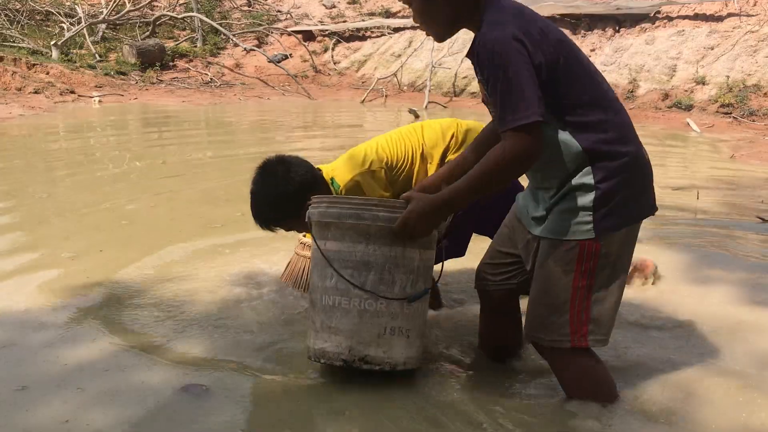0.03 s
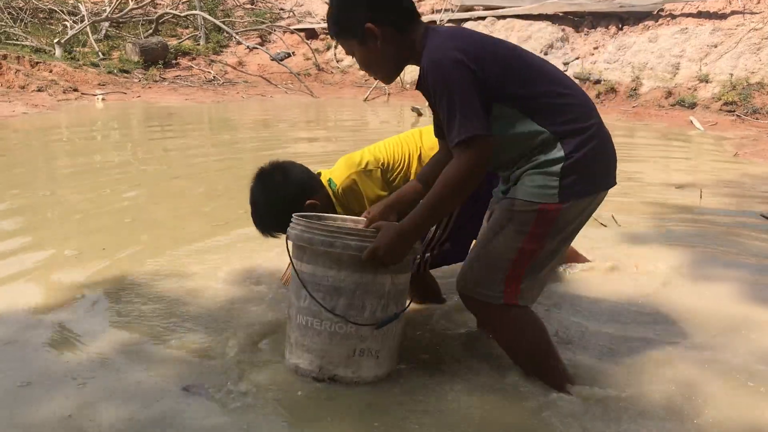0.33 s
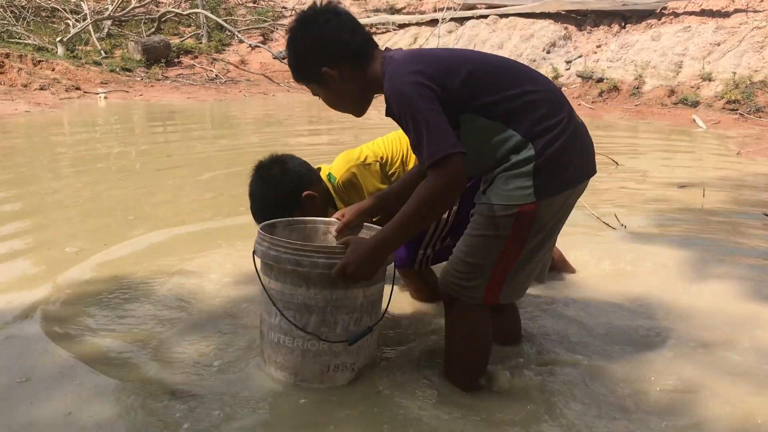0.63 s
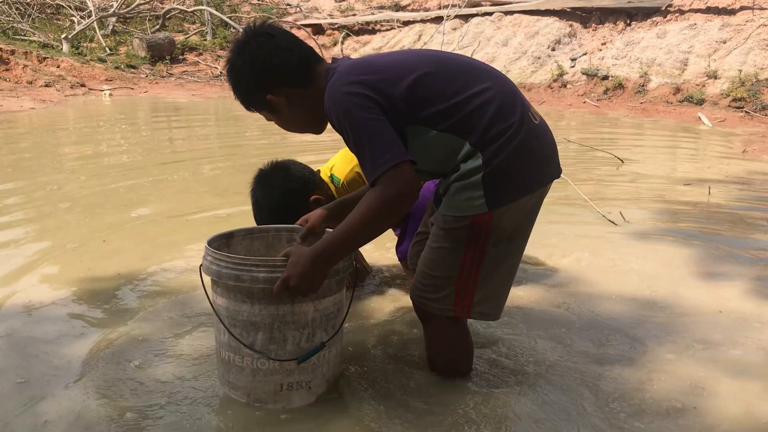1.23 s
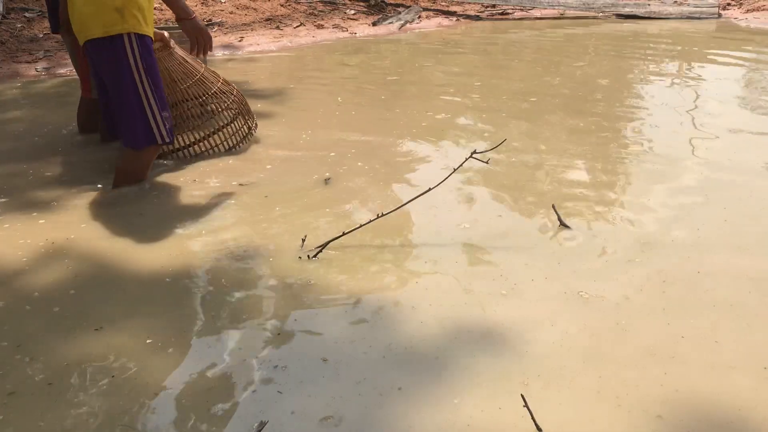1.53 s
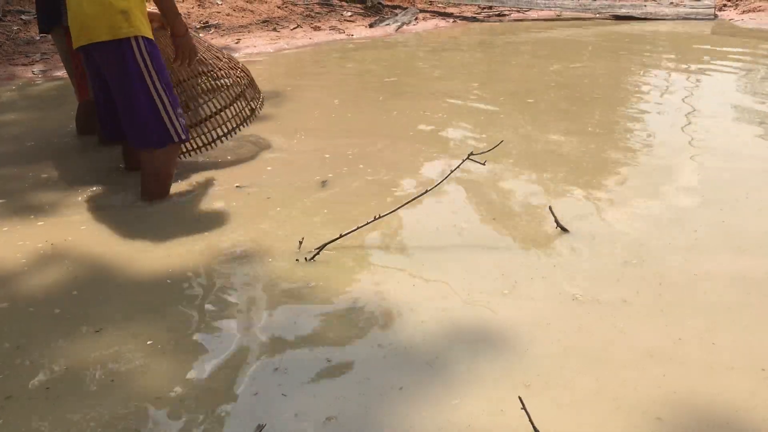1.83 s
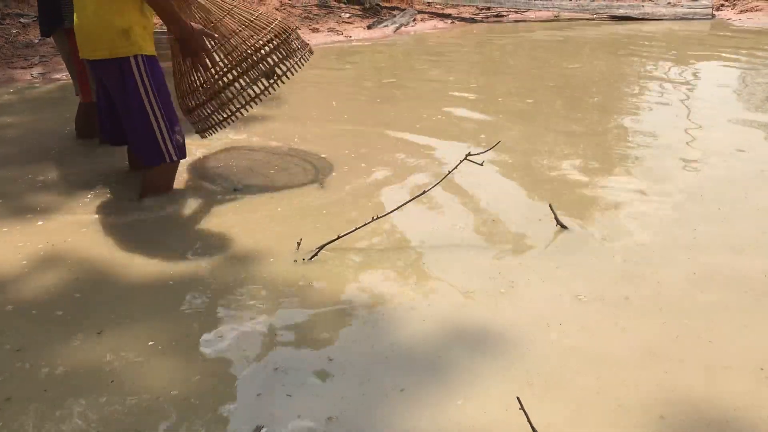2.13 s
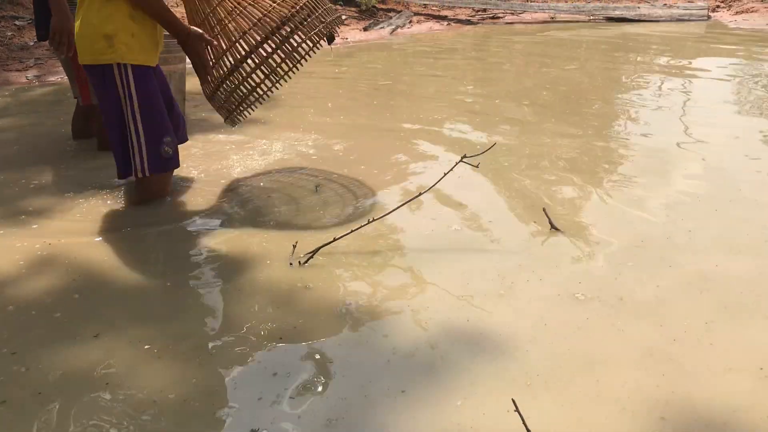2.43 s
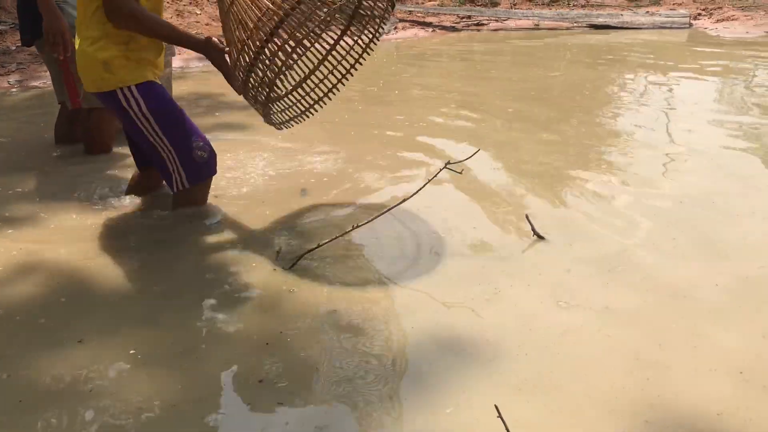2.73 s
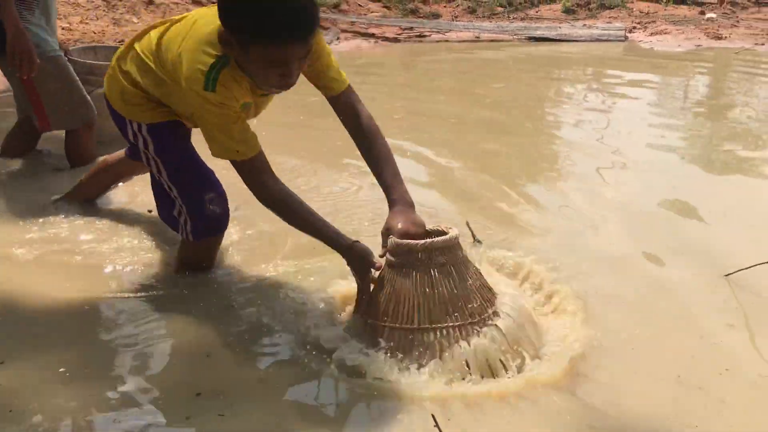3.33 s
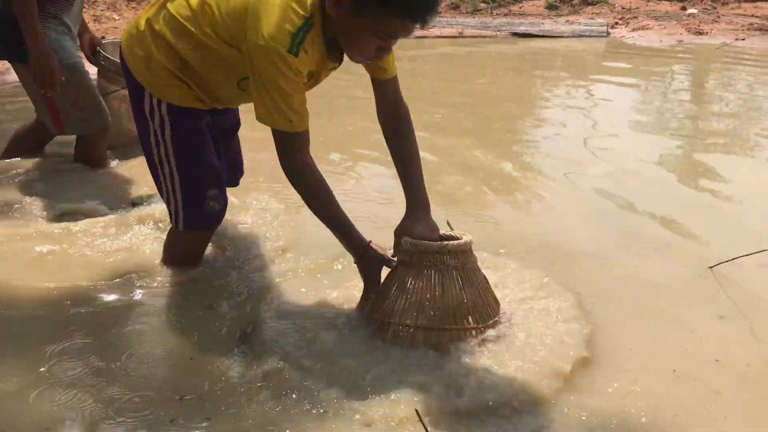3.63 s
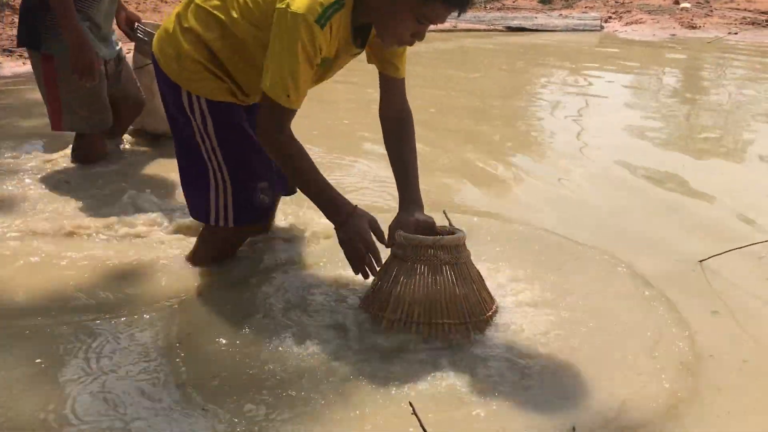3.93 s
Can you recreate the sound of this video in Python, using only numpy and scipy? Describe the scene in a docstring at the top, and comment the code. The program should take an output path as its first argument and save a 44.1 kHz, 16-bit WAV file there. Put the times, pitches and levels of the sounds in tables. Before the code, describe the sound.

A loud splash in a shallow pond comes near the end, as a wicker trap is plunged in close by. Before it, wading legs and a bucket stir soft swishes, drips and gurgles. Cicadas buzz in the background outdoors.

```python
"""A shallow pond among trees: children wade, and legs and a bucket stir up swishes, drips and gurgles.
After an abrupt change of place a wicker fish trap is lifted, dripping, and plunged into the water:
its rim slaps the surface, spray flies through the canes, the water churns and drops fall back.
The water sounds by impact and by bubble resonance, trapped air ringing like a mass on a spring.
Cicadas buzz throughout, their rapid clicks forcing narrow body resonances."""
import sys
import numpy as np
from scipy import signal
from scipy.fft import rfft, irfft
from scipy.io import wavfile
from scipy.ndimage import uniform_filter1d, map_coordinates

SR = 44100
rng = np.random.default_rng(int(sys.argv[2]) if len(sys.argv) > 2 else 0)


def to_wav(s):
    """Save 16-bit WAV."""
    ch = np.atleast_2d(s).T  # columns
    pcm = np.round(np.clip(ch, -1, 1) * 32767)  # PCM
    wavfile.write(sys.argv[1], SR, pcm.astype(np.int16))


N = 176400
TIME, BIN_HZ = np.arange(N) / SR, np.arange(N // 2 + 1) * SR / N
PLACE_CHANGE_S, PLUNGE_ATTACK_S, BUBBLE_RISE_OCT = 1.474, .004, 0.38

# Envelopes of the plunge; the wash is the wave rolling back on the trap: time_s, relative_level_db
SPRAY_ENVELOPE = [(3.274, -42.5), (3.302, -39.5), (3.338, -34.5), (3.4, -34.5), (3.416, -35.5),
                  (3.432, -40), (3.484, -34.5), (3.515, -44.5), (3.574, -46), (3.606, -41), (3.634, -51),
                  (3.73, -55), (4.0, -52)]
CHURN_ENVELOPE = [(3.274, -47.5), (3.342, -39.5), (3.354, -24.5), (3.392, -29.5), (3.414, -24.5),
                  (3.444, -31.5), (3.456, -28), (3.576, -44.5), (3.582, -38), (3.738, -59.5), (3.76, -50)]
GULP_ENVELOPE = [(3.32, -70), (3.328, -98), (3.348, -40), (3.45, -43.5), (3.522, -66), (3.582, -58.5),
                 (3.656, -81), (3.72, -60)]
WASH_ENVELOPE = [(3.70, -84), (3.82, -54), (3.9, -61), (4, -77)]
# Their spectra: frequency_hz, gain_db
SPRAY_SPECTRUM = [(1290, 1.5), (2200, 0.5), (2310, -4), (2700, -0.5), (4940, -6), (6430, -10.5),
                  (10000, -15), (10400, -20), (11400, -10.5), (15800, -14)]
CHURN_SPECTRUM = [(520, -0.5), (680, -6.5), (900, 1.5), (1200, 0), (1600, -1), (1950, -16), (2600, -13)]
GULP_SPECTRUM = [(110, -19), (160, -6), (210, 1.5), (260, -6.5), (340, 2), (520, -13.5)]
WASH_SPECTRUM = [(160, 5), (260, 7), (420, 8.5), (700, -27)]
def plunge():
    """Air entrainment: the trap drives air under; small bubbles ring high, large pockets low."""
    spray = bubble_cloud(SPRAY_SPECTRUM, cycles=8.5, size_db=2.5, foam_db=-3, count=2500)
    churn = bubble_cloud(CHURN_SPECTRUM, cycles=29, size_db=3.5, foam_db=-9, count=700)
    gulp = bubble_cloud(GULP_SPECTRUM, cycles=16.6, size_db=2, foam_db=0, count=200)
    crackle = spatter(N, hz=7500, width_hz=9000, size_db=5, count=7000)  # drops on cane and water
    wash = bubble_cloud(WASH_SPECTRUM, cycles=17, size_db=3, foam_db=0, count=250)
    tail_trim = from_db(-13 * np.maximum(TIME - 3.84, 0))  # the last spray holds nearly level, a faint fizz
    return (tail_trim * burst(SPRAY_ENVELOPE) * (spray + from_db(-13.5) * crackle)
            + from_db(-5.5) * burst(CHURN_ENVELOPE) * churn
            + from_db(-2) * burst(GULP_ENVELOPE) * gulp
            + burst(WASH_ENVELOPE) * wash)


def bubble_cloud(spectrum, cycles, size_db, foam_db, count):
    """Superposition: many random bubbles merge into an even stream over foam noise."""
    out, start_s = np.zeros(N), SPRAY_ENVELOPE[0][0] - PLUNGE_ATTACK_S
    for when, pitch, size, ring, sign in rng.random((count, 5)):
        hz = (np.sqrt(spectrum[0][0]) * (1 - pitch) + np.sqrt(spectrum[-1][0]) * pitch) ** 2
        gain = size_gain(size, size_db) * hz ** .75 * np.sign(sign - .5)
        tone = bubble(hz, cycles * (.5 + ring) / hz, BUBBLE_RISE_OCT * ring)
        add(out, start_s + when * (N / SR - start_s), gain * tone)
    out = colour(out, spectrum)
    power = uniform_filter1d(out ** 2, size=1500)
    even = out / np.sqrt(np.abs(power) + power.max() / 1000)
    return (even + from_db(foam_db) * noise(spectrum)) / np.sqrt(1 + from_db(2 * foam_db))


def bubble(hz, t60_s, rise_oct):
    """Damped oscillation: a bubble rings, gliding in pitch as it nears the surface."""
    age = np.arange(int(t60_s * SR) + 4) / (t60_s * SR)  # share of the ring time
    envelope = (1 - np.exp(-age / 0.057)) * np.exp(-np.log(1000) * age)
    pitch_hz = np.minimum(hz * 2 ** (rise_oct * age), SR / 2)
    return envelope / envelope.max() * np.sin(2 * np.pi * np.cumsum(pitch_hz) / SR)


# Pushes of water: start_s, length_s, level_db, centre_hz, spread_oct
WATER_PUSHES = [(-.02, 0.15, -55.5, 915, 1.19), (0.127, 0.18, -52.5, 1200, 1.2),
                (.275, .15, -52.5, 1252, 1.1), (0.393, .10, -57.5, 2700, 0.9),
                (.46, 0.15, -49.5, 2166, 0.86), (0.57, 0.22, -52.5, 1744, 0.99),
                (.76, 0.34, -60, 1350, 1.1), (1.036, 0.29, -64.5, 1910, 1), (1.256, 0.23, -63, 1204, 1.12),
                (1.602, 0.18, -73, 1163, 1.35), (1.822, 0.52, -71.5, 983, 0.97),
                (2.577, 0.34, -68, 1337, 1.22), (2.827, .19, -60, 2270, 0.78),
                (2.86, 0.14, -54.5, 1067, 0.35), (3.022, 0.077, -54, 1006, 0.75),
                (3.084, 0.19, -59.5, 1337, 0.7), (3.729, 0.24, -58, 1030, 1.55),
                (3.82, 0.34, -47.5, 966, 1.12)]
def swishes(count=150):
    """Displacement: water pushed aside swells and ebbs, shedding bubbles, foam and tiny impacts."""
    out, octave = np.zeros(N), np.log2(np.arange(1, SR // 2 + 2))
    for start_s, length_s, db, centre_hz, spread_oct in WATER_PUSHES:
        n, fizz = int(length_s * SR), np.zeros(N)
        for (when, size, ring), scatter in zip(rng.random((count, 3)), rng.standard_normal(count)):
            hz = np.clip(centre_hz * 2 ** (spread_oct * scatter), 180, 9000)
            gain = size_gain(size, size_db=3) * np.sqrt(min(hz, centre_hz))
            tone = bubble(hz, t60_s=21 * (.5 + ring) / hz, rise_oct=2 * BUBBLE_RISE_OCT * ring)
            add(fizz, when * length_s, gain * tone)
        detuning = (octave - np.log2(centre_hz)) / (2.8 * spread_oct)
        band = (1 + detuning ** 2) ** -2.2 / np.sqrt(2 ** octave + centre_hz)
        foam = from_db(-7.5) * rms_one(irfft(rfft(rng.standard_normal(SR)) * band)[:n])
        ticks = from_db(-11) * spatter(n, hz=2700, width_hz=2000, size_db=3.5, count=70)
        swell = np.sqrt(np.interp(np.arange(n) / n, [0, 0.23, 1], [0, 1, 0]))
        add(out, max(start_s, 0), from_db(db) * swell * (rms_one(fizz[:n]) + foam + ticks))
    return out


# Single bubbles and drips: start_s, pitch_hz, peak_db, t60_s, rise_oct
SINGLE_BUBBLES = [(.047, 684, -47, 0.035, -0.63), (.126, 2140, -38, 0.018, 0.42),
                  (0.1473, 2360, -26, 0.0041, 0.71), (0.16, 2180, -34, 0.012, 0.41),
                  (.152, 230, -55, 0.087, 0.54), (.211, 1004, -41.5, 0.033, 0.0043),
                  (0.266, 1990, -35, 0.028, 0.15), (.270, 520, -42.5, 0.076, 1.19),
                  (.291, 1400, -38.5, 0.017, 0.31), (.292, 2130, -33, 0.0095, 0.12),
                  (.301, 810, -43, 0.03, -0.49), (.298, 260, -49, 0.054, -0.64),
                  (.314, 612, -48, 0.053, -0.12), (.3655, 700, -39.5, 0.038, 0.4),
                  (0.363, 1576, -47, 0.041, 0.5), (.391, 1060, -44, 0.04, 0.95),
                  (0.42, 2270, -44, 0.024, 1.5), (.437, 1970, -42, 0.041, 0.3),
                  (.466, 666, -43, 0.048, 0.27), (0.4657, 1650, -36, 0.0066, 0.12),
                  (.479, 1350, -38, 0.02, -0.31), (.510, 1360, -43, 0.017, 0.11),
                  (.510, 2800, -42, 0.014, -0.25), (.575, 2090, -39, 0.019, 0.44),
                  (.633, 1420, -44.5, 0.014, 0.3), (0.6484, 2030, -34.5, 0.013, 0.07),
                  (0.691, 2320, -44, 0.018, 0.15), (.750, 1150, -48, 0.043, 0.14),
                  (.761, 1020, -42.5, 0.049, 0.26), (.757, 368.7, -42.5, 0.17, 0.57),
                  (.775, 660, -44.5, 0.027, 0.63), (0.8229, 2080, -35.5, 0.026, 0.69),
                  (.942, 940, -52.5, 0.039, -0.14), (1.09, 2130, -56, 0.042, -0.051),
                  (1.211, 1450, -49, 0.022, -0.093), (1.248, 783, -48, 0.053, 1.35),
                  (1.283, 287, -46, 0.053, -0.32), (1.285, 2170, -51, 0.03, 0.053),
                  (1.298, 625, -50.5, 0.058, 0.68), (1.31, 1530, -45, 0.019, 0.044),
                  (1.374, 2430, -47.5, 0.021, -0.085), (1.406, 1280, -49.5, 0.026, 0.65),
                  (1.439, 1270, -51, 0.031, 0.28), (1.628, 225, -56.5, 0.085, -0.73),
                  (1.635, 794, -55, 0.02, 0.4), (1.945, 188.4, -58, 0.28, -0.83),
                  (2.118, 277, -55.5, 0.14, -1.7), (2.614, 700, -54, 0.023, -1.1),
                  (2.655, 2790, -56.5, 0.02, .1), (2.838, 1740, -44, 0.021, 0.05),
                  (2.860, 1014, -43.5, .045, -0.081), (2.890, 840, -45, 0.065, 0.15),
                  (2.912, 905, -52, 0.039, 0.022), (2.933, 885, -48.5, 0.034, 0.12),
                  (3.04, 2330, -45, .025, 0.11), (3.045, 658, -48.5, 0.075, -0.16),
                  (3.052, 1160, -41.5, 0.031, 0.94), (3.148, 1500, -48, 0.028, 0.51),
                  (3.168, 580, -52.5, 0.073, 0.39), (3.197, 3320, -48.5, 0.021, 0.77),
                  (3.353, 1467, -24, 0.016, 0.64), (3.365, 743, -30, 0.06, -0.54),
                  (3.411, 1220, -33, 0.024, -0.055), (3.425, 910, -19, 0.0083, 0.23),
                  (3.455, 1080, -28.5, 0.054, 0.38), (3.481, 1210, -22.5, 0.012, -0.34),
                  (3.514, 1190, -33, .03, 0.65), (3.533, 1450, -35, 0.02, 0.42),
                  (3.541, 986, -43, 0.061, 0.11), (3.581, 1380, -39, 0.022, .1),
                  (3.595, 1640, -44, 0.031, 0.7), (3.618, 1200, -40, 0.021, 0.68),
                  (3.630, 797, -37.5, 0.043, 1.18), (3.958, 720, -42.5, 0.064, 0.58),
                  (3.992, 1430, -39, 0.047, 0.36)]
def plinks():
    """Frequency modulation: a lone bubble's pitch wobbles as it deforms."""
    out, wobble = np.zeros(N), 1 + 0.032 * drift(190)
    for start_s, hz, db, t60_s, rise_oct in SINGLE_BUBBLES:
        ring = bubble(hz, t60_s, rise_oct)
        clock = np.cumsum(np.roll(wobble, -int(start_s * SR))[:len(ring)])
        add(out, start_s, from_db(db) * np.interp(clock, np.arange(len(ring)), ring))
    return out


# Drops striking the surface and ticks of cane: start_s, peak_db, centre_hz, t60_s
IMPACTS = [(0.148, -25, 2930, 0.0035), (.158, -37, 11100, 0.016), (.161, -31.5, 3670, 0.013),
           (.228, -37, 5200, .02), (0.238, -29, 13300, 0.022), (.293, -34, 2900, 0.07),
           (.466, -38, 2600, 0.06), (.4795, -34, 2530, 0.013), (0.49, -35, 2170, 0.01),
           (0.548, -37, 3620, 0.0093), (.548, -40, 10000, .006), (.649, -38, 2400, 0.015),
           (1.378, -42, 13000, 0.011), (2.717, -45.5, 11000, 0.014), (2.7162, -37.5, 4130, 0.015),
           (2.748, -45, 2620, 0.033), (.134, -37, 3560, 0.014), (0.302, -38, 2800, .012),
           (0.365, -40.5, 1540, 0.013), (0.693, -46, 3020, 0.022), (2.912, -50, 4200, .07),
           (2.946, -43, 3580, 0.018), (3.047, -46, 3300, .012), (3.122, -51, 12000, .012),
           (3.156, -39, 3360, .018), (3.163, -41, 11500, 0.022), (3.1975, -43, 3950, .014),
           (3.2723, -21.5, 4600, 0.029), (3.2812, -15.5, 11500, 0.0016), (3.283, -29, 12000, 0.049),
           (3.317, -27, 6050, 0.0056), (3.339, -22.5, 5600, 0.037), (3.358, -26.5, 7400, 0.089),
           (3.3553, -18.5, 1580, 0.0064), (3.412, -23.5, 2350, 0.0071), (3.414, -22, 3900, 0.045),
           (3.604, -30, 7340, 0.019), (3.617, -31, 3500, 0.013), (3.677, -34, 4180, 0.0097),
           (3.861, -39.5, 4870, 0.011), (3.976, -49, 13000, .008)]
def smacks():
    """Impact excitation: a click at first contact, then a short, broad ring."""
    out, age_s = np.zeros(N), np.arange(SR // 10) / SR
    for start_s, db, hz, t60_s in IMPACTS:
        envelope = (1 - np.exp(-age_s / 0.00028)) * np.exp(-np.log(1000) * age_s / t60_s)
        ring = resonate(rng.standard_normal(len(age_s)) * envelope, hz, 0.27 * hz)
        click = resonate(resonate(1. * (age_s == 0), hz, hz), hz, hz)
        add(out, start_s, from_db(db) * (ring / np.abs(ring).max() + 0.22 * click / np.abs(click).max()))
    return out


# Water running off legs, bucket and trap: start_s, length_s, typical_peak_db, typical_pitch_hz
RUNOFF = [(0.099, 0.29, -47, 1600), (0.457, 0.29, -59, 2000), (.732, 0.33, -61, 1840),
          (1.077, 0.37, -55.5, 2200), (1.624, 0.29, -61.5, 1450), (2.681, 0.29, -57, 2920),
          (3.001, 0.21, -58, 2700), (3.52, 0.16, -43.5, 1920)]
def dribbles(count=14, spread_oct=.8, spread_db=4):
    """Bubble resonance: each small drop traps air that rings briefly with rising pitch."""
    out = np.zeros(N)
    for start_s, length_s, db, typical_hz in RUNOFF:
        for k, (when, pitch, size) in enumerate(rng.uniform(-1, 1, (count, 3))):
            hz = typical_hz * 2 ** (spread_oct * pitch)
            tone = bubble(hz, t60_s=25 / hz, rise_oct=0.37)
            add(out, start_s + length_s * (k + when) / count, from_db(db + spread_db * size) * tone)
    return out


# Closing hollows in the water: start_s, length_s, level_db, start_hz, end_hz
HOLLOWS = [(0.151, 0.097, -57, 215, 332), (.215, 0.087, -58.5, 296, 638), (0.31, 0.12, -62, 692, 1249),
           (0.65, 0.13, -61.5, 466, 362), (0.779, 0.19, -63.5, 430, 1398), (1.612, 0.041, -66.5, 886, 1960),
           (1.928, 0.06, -61.5, 820, 745), (1.93, 0.085, -64.5, 195, 159.5), (2.621, 0.21, -77, 600, 1100),
           (2.722, 0.27, -63, 572, 1163), (3.193, 0.083, -62, 752, 1240), (3.783, 0.2, -62, 209, 332)]
def gurgles(width_share=0.16, steady_cycles=8.4):
    """Cavity resonance: a steady flow rings a hollow whose pitch glides as the water closes in."""
    out = np.zeros(N)
    for start_s, length_s, db, start_hz, end_hz in HOLLOWS:
        along = np.linspace(0, 1, int(length_s * SR))
        ring = resonate(rng.standard_normal(SR), start_hz, width_share * start_hz)
        ring = resonate(ring, start_hz, 4 * width_share * start_hz)
        power = uniform_filter1d(ring ** 2, size=int(steady_cycles * SR / start_hz))
        clock = SR / 10 + np.cumsum((end_hz / start_hz) ** along)
        glide = np.interp(clock, np.arange(SR), ring / np.sqrt(power + 1e-12))
        add(out, start_s, from_db(db) * rms_one(glide) * np.sqrt(np.abs(np.sin(np.pi * along))))
    return out


# Showers of fine droplets: start_s, length_s, level_db
SHOWERS = [(0.142, 0.2, -63), (0.445, 0.11, -64.5), (0.565, 0.19, -67.5), (2.861, .12, -71),
           (3.04, 0.19, -75), (3.32, .035, -40.5), (3.584, 0.029, -43.5), (3.801, 0.19, -78)]
def patter():
    """Impact noise: fine droplets fall back on the surface as bright ticks."""
    out = np.zeros(N)
    for start_s, length_s, db in SHOWERS:
        ticks = spatter(int(length_s * SR), hz=12100, width_hz=5800, size_db=5.5, count=55)
        add(out, start_s, from_db(db) * ticks)
    return out


def spatter(n, hz, width_hz, size_db, count):
    """Shot noise: tiny random impacts of very uneven size over n samples; rms 1."""
    when, size, sign = rng.random((count, 3)).T
    clicks = np.zeros(n + 1)
    np.add.at(clicks, (when * n).astype(int), size_gain(size, size_db) * np.sign(sign - .5))
    return rms_one(resonate(resonate(clicks[:n], hz, width_hz), hz, 2 * width_hz))


def banks(x, gain_db=-19, t60_s=0.48, lowpass_hz=4060):
    """Diffuse reflection: the shore scatters back a faint, dull tail."""
    age_s = np.arange(SR // 2) / SR
    tail = rng.standard_normal(len(age_s)) * np.exp(-np.log(1000) * age_s / t60_s) * (age_s > .008)
    tail = signal.lfilter([1], [1, -np.exp(-2 * np.pi * lowpass_hz / SR)], tail)
    return from_db(gain_db) * signal.fftconvolve(x, tail / np.linalg.norm(tail))[:N]


# Envelopes of a near chorus, a far chorus and one brief caller: time_s, level_db
NEAR_ENVELOPE = [(0, -52), (.16, -51.5), (.22, -63), (.46, -70), (.58, -56.5), (.70, -53), (.88, -52),
                 (1.15, -54), (1.38, -52.5), (1.47, -51.5)]
FAR_ENVELOPE = [(0, -55.5), (.45, -70), (1.0, -58), (1.5, -55.5), (2.08, -56.5), (2.7, -57.5), (3.2, -55),
                (4, -58)]
CALL_ENVELOPE = [(1.5, -89), (1.62, -63), (1.8, -56.5), (2.0, -57.5), (2.07, -90)]
# Their body resonances: pitch_hz, nominal_width_hz, relative_level_db
NEAR_RESONANCES = [(4560, 100, -13), (4970, 62, -4.5), (5350, 170, -2.5), (6120, 200, -0.5),
                   (6410, 140, -2), (7040, 330, 3), (7720, 120, -6), (8180, 200, -3), (9250, 1100, -8),
                   (14300, 500, -14)]
FAR_RESONANCES = [(4560, 1120, -7), (5350, 270, -7), (5790, 600, -4.5), (6730, 390, -3), (7310, 69, -1),
                  (7770, 750, 1.5), (8510, 1000, -5.5), (9380, 1340, -8)]
CALL_RESONANCES = [(4960, 1400, -3), (6460, 1000, 1.5), (10600, 2100, -12.5)]
# The near chorus starts again a little sharp, then settles: time_s, pitch_rise_share
NEAR_DETUNING = [(.2, .005), (.6, .045), (.74, .035), (.86, 0)]
def cicadas(first_place):
    """Incoherent sources add: two choruses, a brief call and one insect holding a thin tone."""
    near = buzz(NEAR_RESONANCES, clicks_per_s=410, jitter=0.016, throb_db=0.3, sharp=curve(NEAR_DETUNING))
    far = buzz(FAR_RESONANCES, clicks_per_s=430, jitter=0.049, throb_db=0.42)
    shrill = buzz([(7074, 80, 0)], clicks_per_s=430, jitter=0.014, throb_db=2)
    call = buzz(CALL_RESONANCES, clicks_per_s=430, jitter=0.027, throb_db=2)
    return (level(NEAR_ENVELOPE) * first_place * near + level(FAR_ENVELOPE) * far
            + level(CALL_ENVELOPE) * call + from_db(-67) * shrill)


def buzz(modes, clicks_per_s, jitter, throb_db, sharp=0):
    """Forced vibration: rasping clicks drive a cicada's body resonances; the level throbs a little."""
    phase = np.cumsum(clicks_per_s * (1 + jitter * drift(7.4))) / SR
    rasp = rng.standard_normal(N) * (0.5 + np.exp(-4 * (phase % 1)))
    body = np.zeros(N)
    for k, (hz, width_hz, db) in enumerate(modes):
        ring = resonate(resonate(rasp, hz, 1.07 * width_hz), hz, 1.07 * width_hz)
        body += (-1) ** k * from_db(db) * rms_one(ring)
    if np.any(sharp):
        body = map_coordinates(body, [np.cumsum(np.ones(N) + sharp)], order=5, mode="mirror")
    return rms_one(body) * from_db(throb_db * drift(25))


# Spectra of the open air and of a high hiss: frequency_hz, gain_db
AIR_SPECTRUM = [(28, -13), (42, -6.5), (62, -2.5), (90, -8), (160, -12.5), (280, -11), (450, -18.5),
                (700, -20.5), (1850, -22.5), (3600, -28.5)]
HISS_SPECTRUM = [(3000, 4), (4500, -10), (9000, 6.5), (10500, 1.5), (11700, 7), (13000, 5.5), (14500, 8.5),
                 (16000, 7.5)]
def open_air(first_place):
    """Ambient noise: a steady low rush, and a hiss that is 6 dB louder in the first place."""
    return from_db(-69) * noise(AIR_SPECTRUM) + from_db(-72 + 6 * first_place) * noise(HISS_SPECTRUM)


def from_db(db):
    """Decibels to amplitude ratio."""
    return 10 ** (np.asarray(db) / 20)


def rms_one(x):
    """Normalisation to unit rms."""
    return x / np.sqrt(np.mean(x ** 2) + 1e-20)


def size_gain(chance, size_db):
    """Exponential distribution of level, capped: many weak events, few strong ones."""
    return from_db(size_db * np.minimum(-np.log(1 - chance), 4))


def curve(rows):
    """Linear interpolation of (time_s, value) rows."""
    return np.interp(TIME, *np.transpose(rows))


def level(rows):
    """Amplitude envelope from (time_s, level_db) rows."""
    return from_db(curve(rows))


def burst(rows):
    """Transient envelope: a fast attack before the first row, exponential decay after the last."""
    attack = np.clip((TIME - rows[0][0]) / PLUNGE_ATTACK_S + 1, 0, 1)
    return level(rows) * attack * np.exp(-np.maximum(TIME - rows[-1][0], 0) / 0.058)


def colour(x, spectrum):
    """Spectral shaping, falling 15.6 dB an octave past the ends of the spectrum."""
    hz, db = np.transpose(spectrum)
    octave, known = np.log2(np.maximum(BIN_HZ, 1)), np.log2(hz)
    beyond_oct = np.abs(octave - np.clip(octave, known[0], known[-1]))
    return irfft(rfft(x) * from_db(np.interp(octave, known, db) - 15.6 * beyond_oct), N)


def noise(spectrum):
    """Coloured Gaussian noise; rms 1."""
    return rms_one(colour(rng.standard_normal(N), spectrum))


def drift(rate_hz):
    """Slow random fluctuation: low-passed noise; rms 1."""
    return rms_one(irfft(rfft(rng.standard_normal(N)) / (1 + (BIN_HZ / rate_hz) ** 2), N))


def resonate(x, hz, width_hz):
    """Second-order resonance with unit peak gain."""
    r = np.exp(-np.pi * width_hz / SR)
    feedback = [1, -2 * r * np.cos(2 * np.pi * hz / SR), r * r]
    return signal.lfilter(np.array([1, 0, -1]) * (1 - r * r) / 2, feedback, x)


def add(out, start_s, sound):
    """Superpose a short sound at start_s."""
    i = int(start_s * SR)
    if 0 <= i < N:
        out[i:i + len(sound)] += sound[:N - i]


def scene():
    """Superposition: water close by with its reflections, cicadas and open air behind."""
    first_place = TIME < PLACE_CHANGE_S
    water = plunge() + swishes() + plinks() + smacks() + dribbles() + gurgles() + patter()
    return (water + banks(water) + cicadas(first_place) + open_air(first_place))[None]


def record(dry, gap_s=.012, cutoff_hz=15800):
    """Gating and band limiting: an instant of silence at the change of place; the top treble is cut."""
    gate = uniform_filter1d((np.abs(TIME - PLACE_CHANGE_S) > gap_s / 2) * 1., size=40)
    lowpass = signal.ellip(10, .2, 70, cutoff_hz, fs=SR, output="sos")
    return signal.sosfilt(lowpass, dry * gate)


dry = scene()
out = record(dry)
to_wav(out)
```